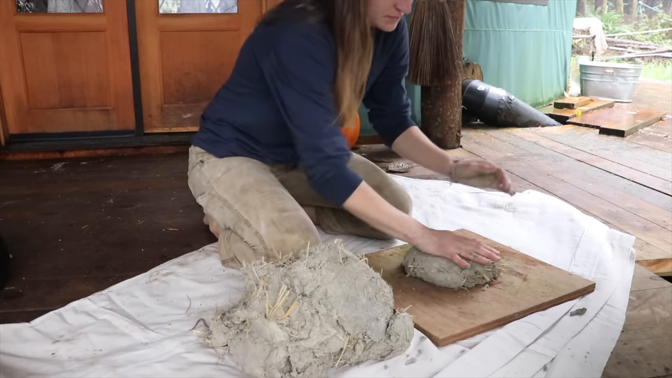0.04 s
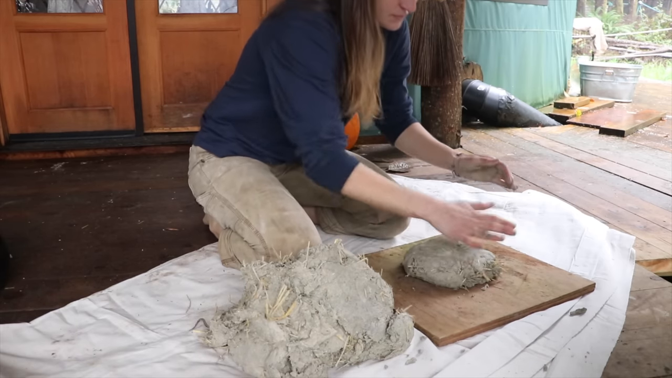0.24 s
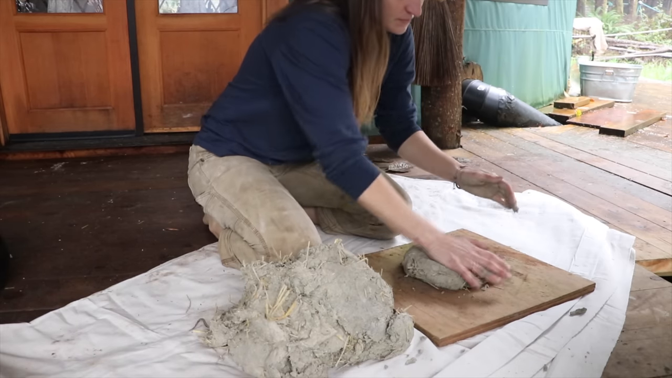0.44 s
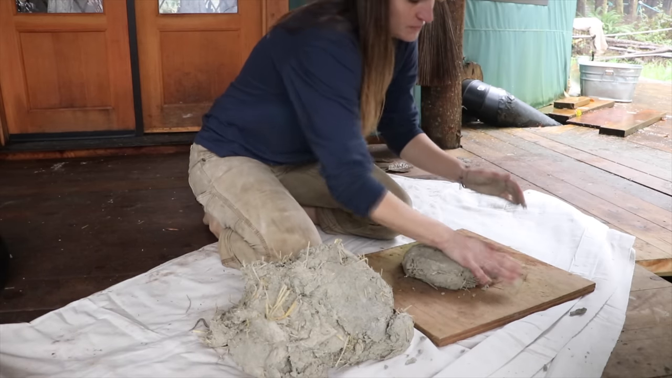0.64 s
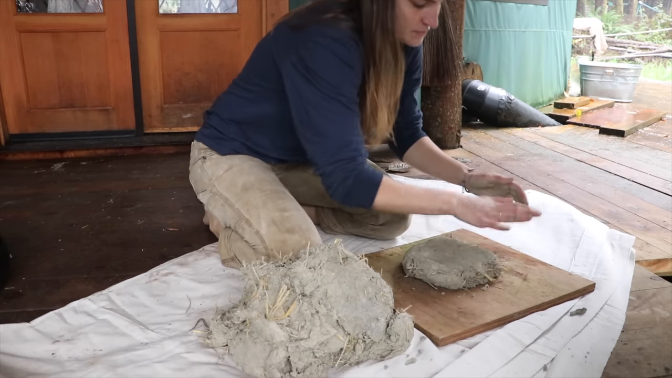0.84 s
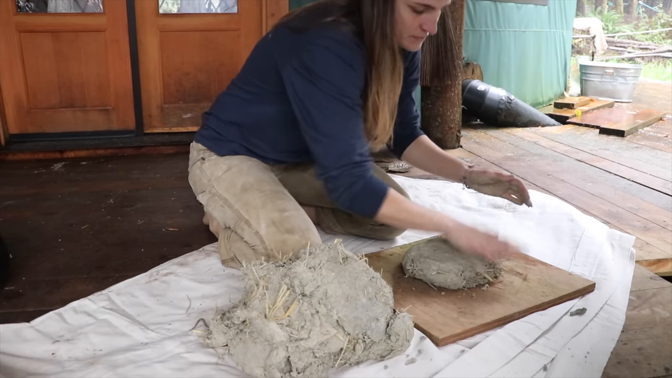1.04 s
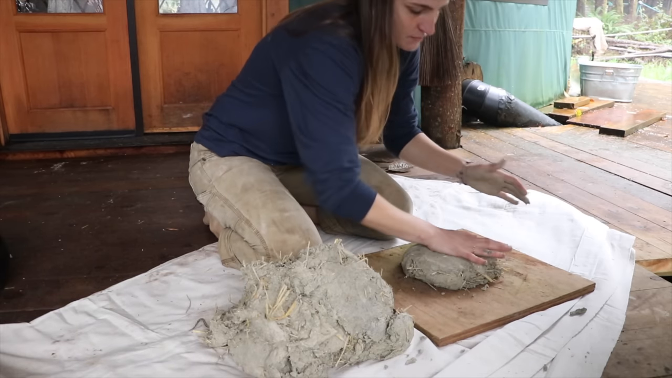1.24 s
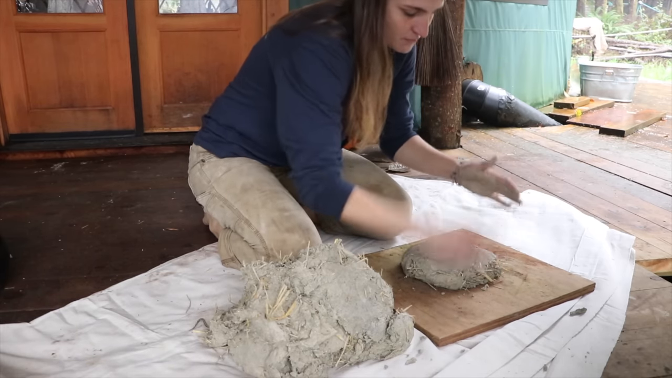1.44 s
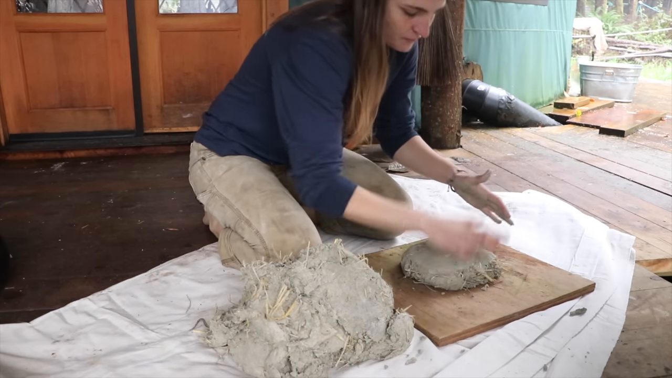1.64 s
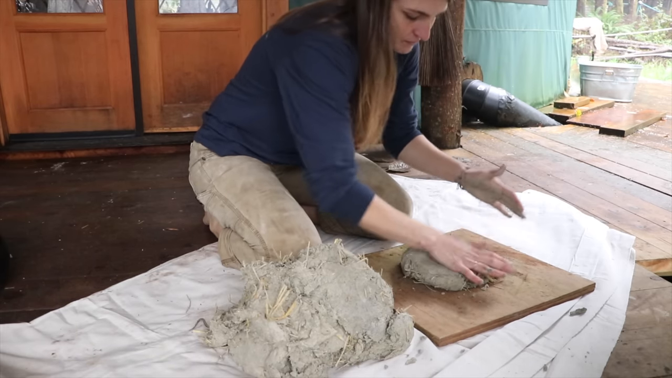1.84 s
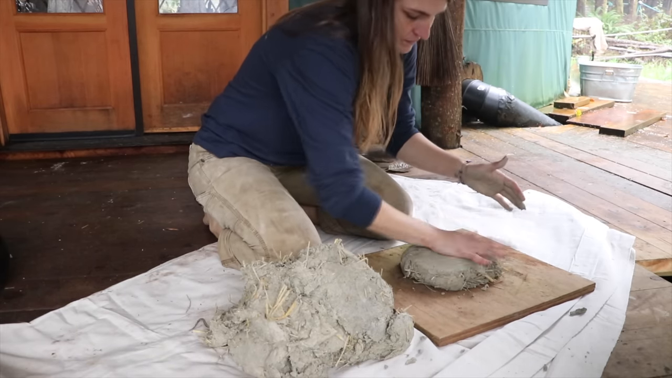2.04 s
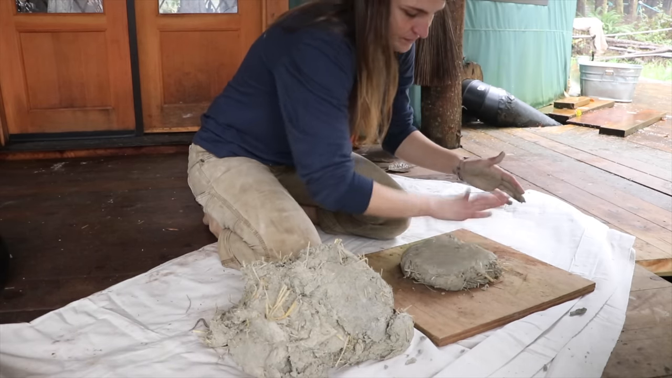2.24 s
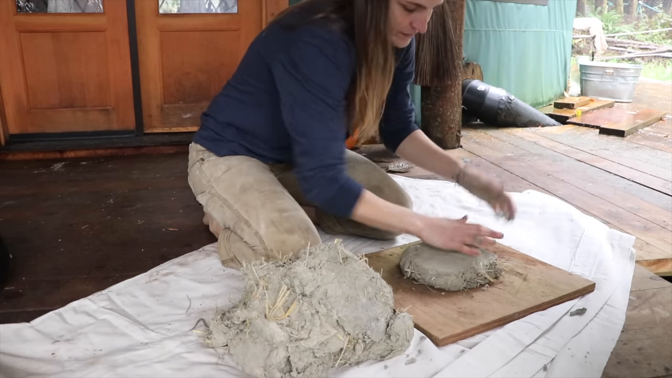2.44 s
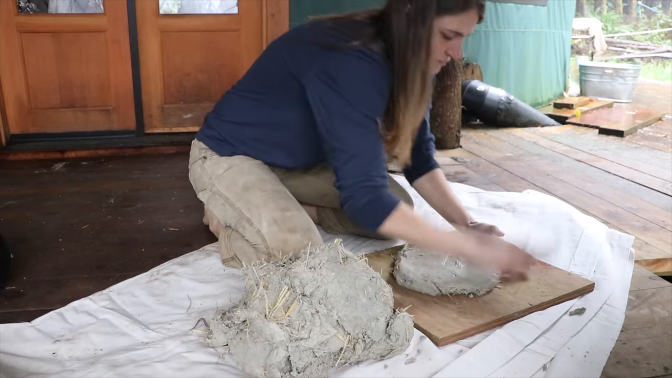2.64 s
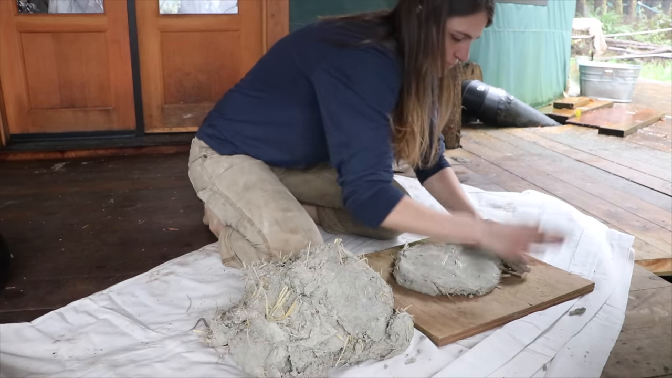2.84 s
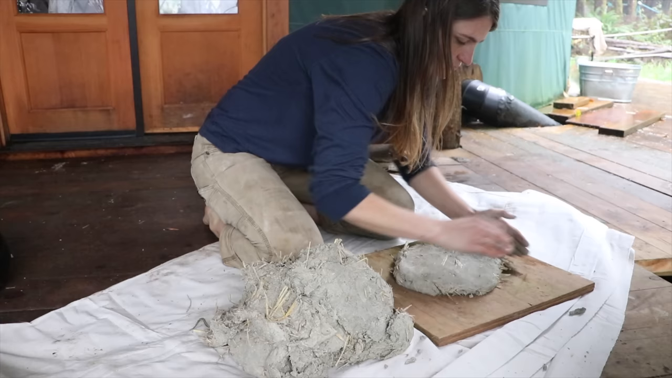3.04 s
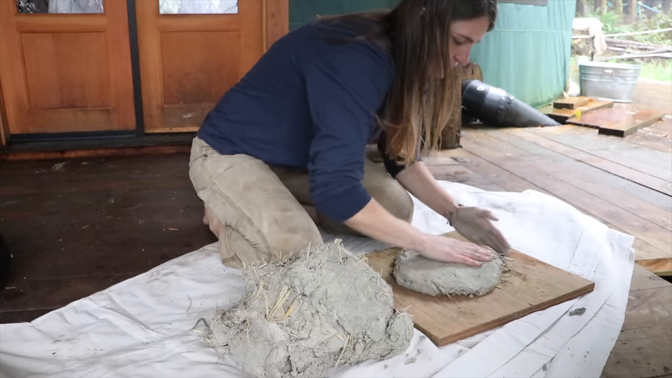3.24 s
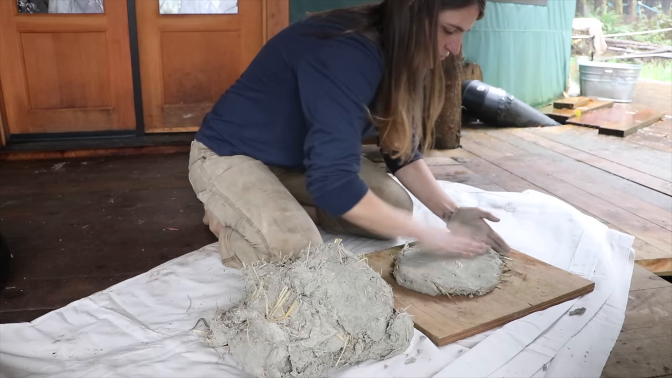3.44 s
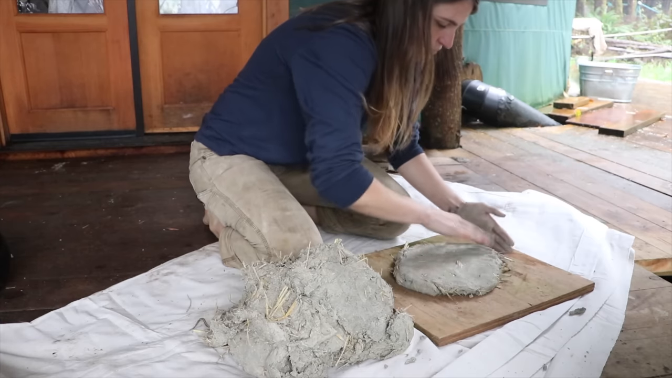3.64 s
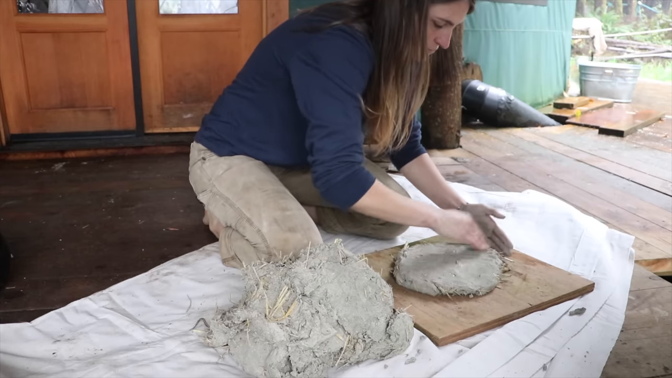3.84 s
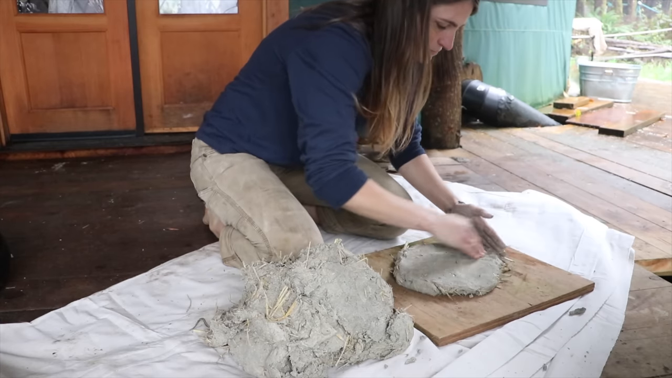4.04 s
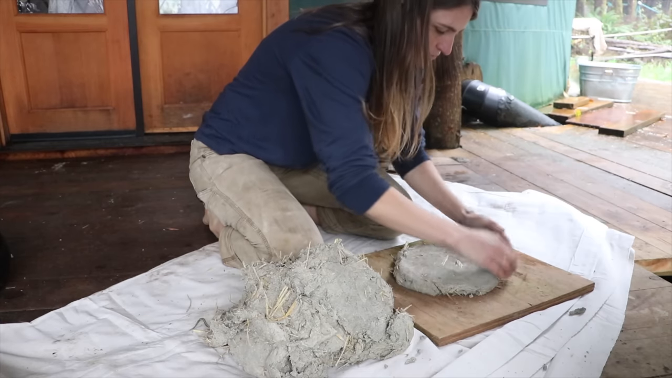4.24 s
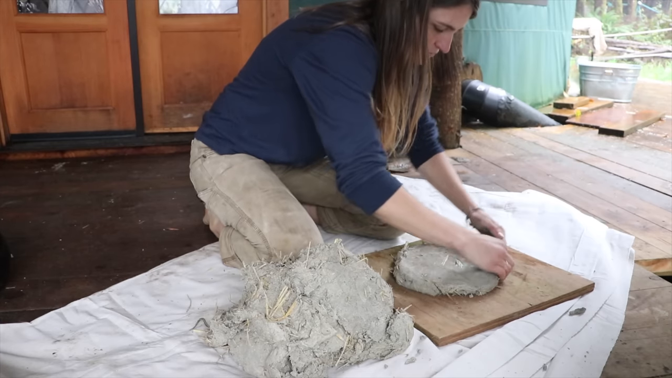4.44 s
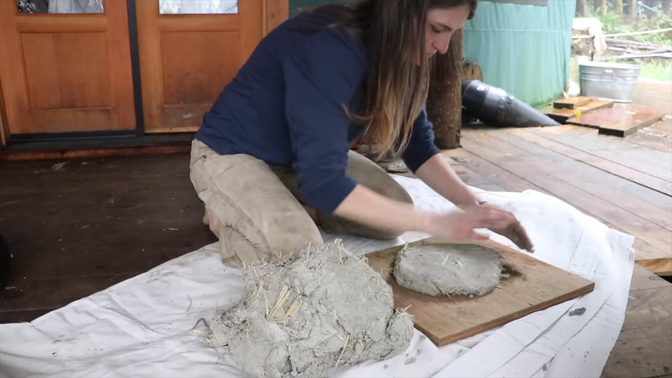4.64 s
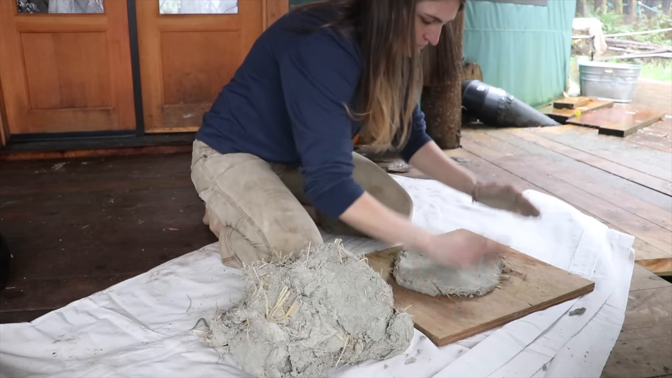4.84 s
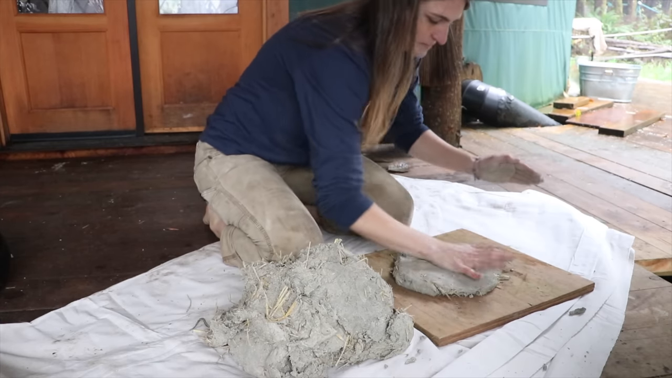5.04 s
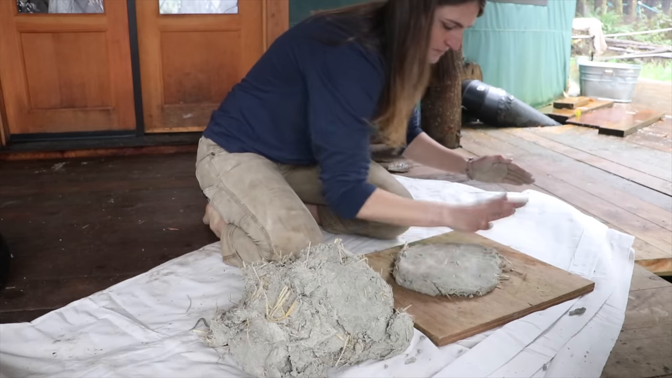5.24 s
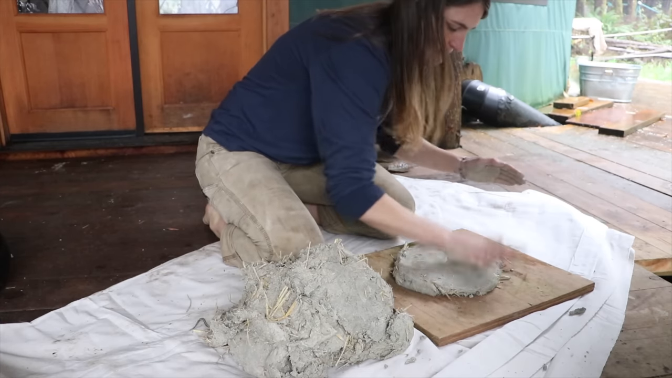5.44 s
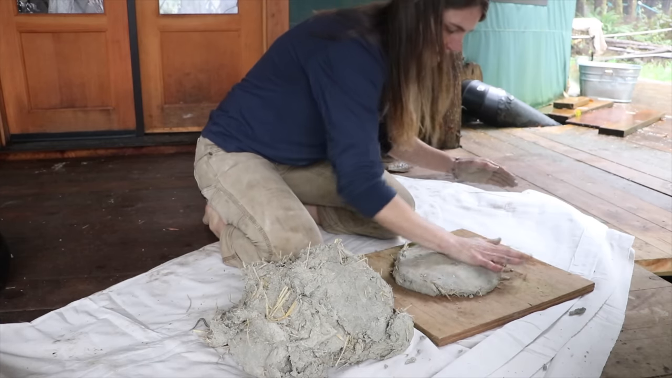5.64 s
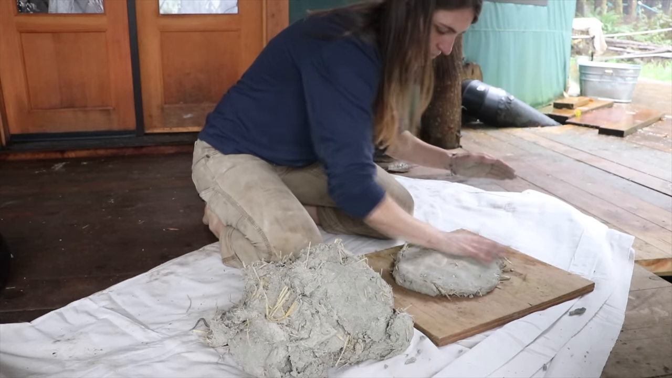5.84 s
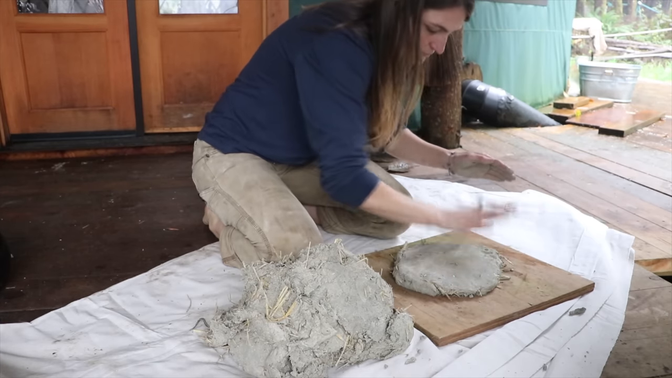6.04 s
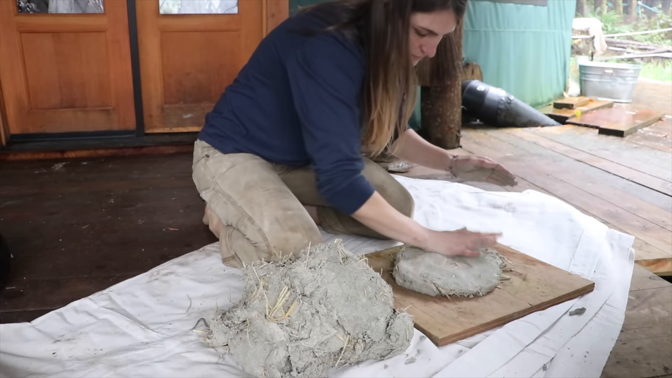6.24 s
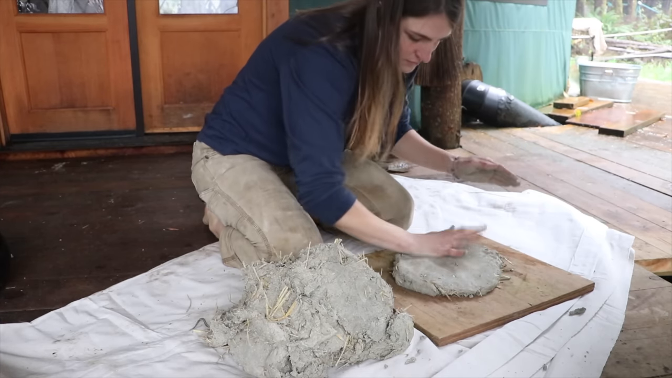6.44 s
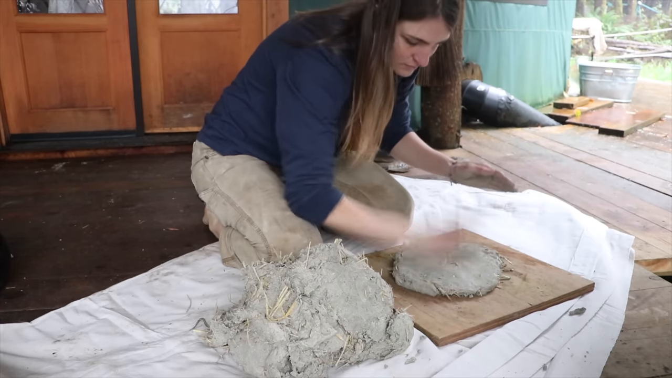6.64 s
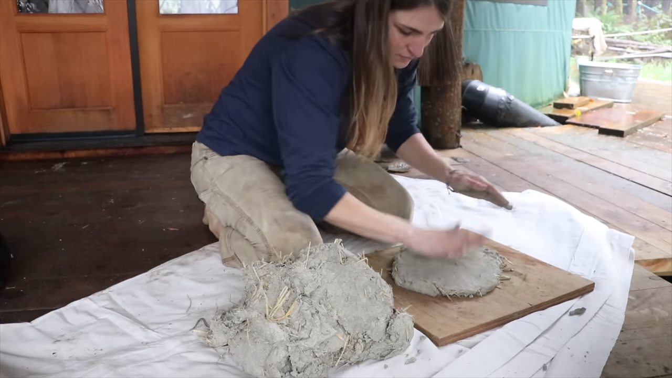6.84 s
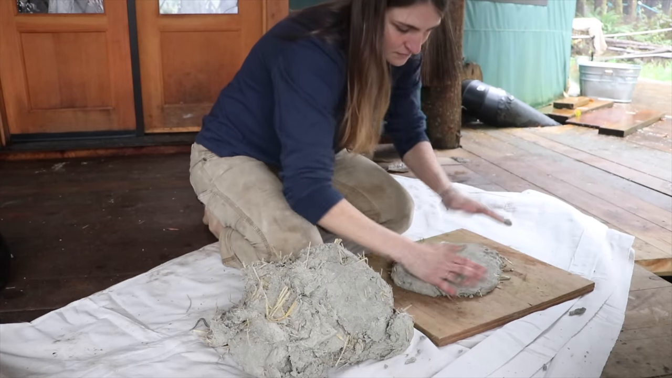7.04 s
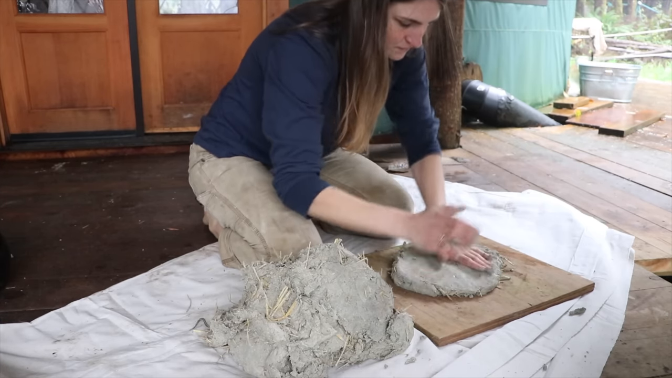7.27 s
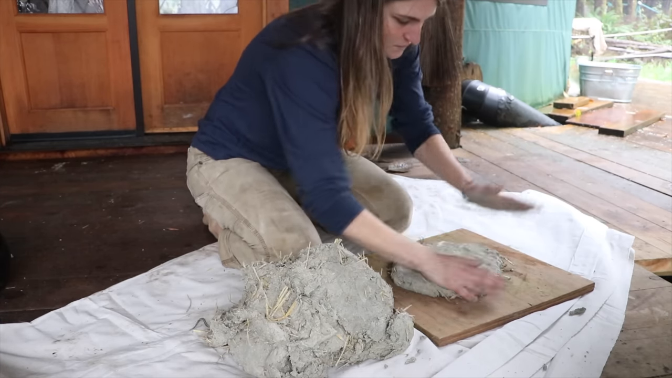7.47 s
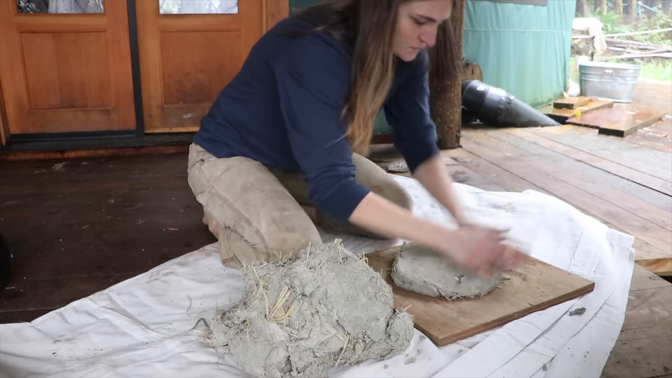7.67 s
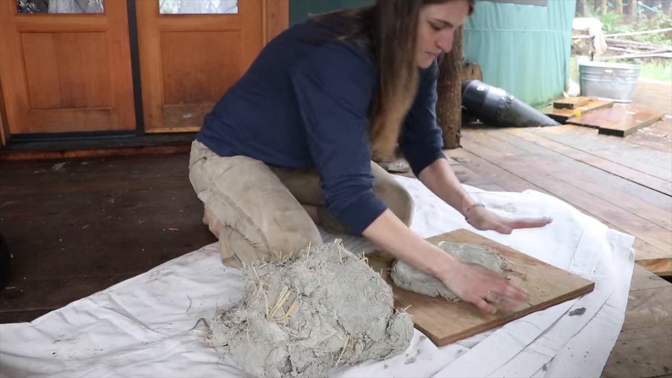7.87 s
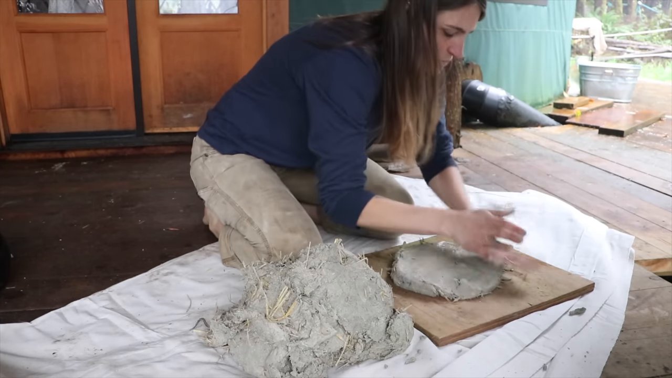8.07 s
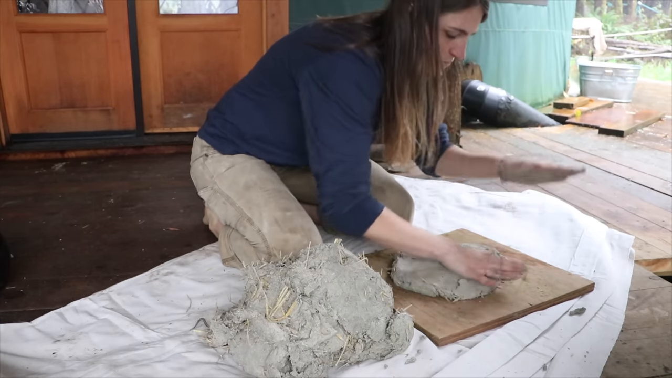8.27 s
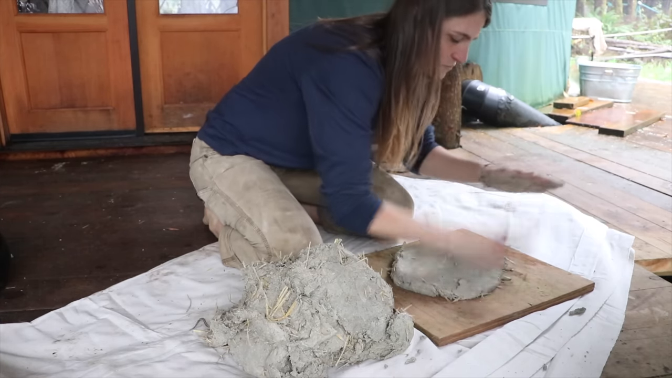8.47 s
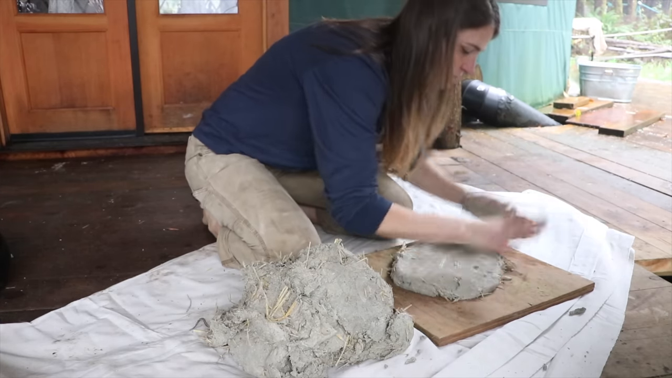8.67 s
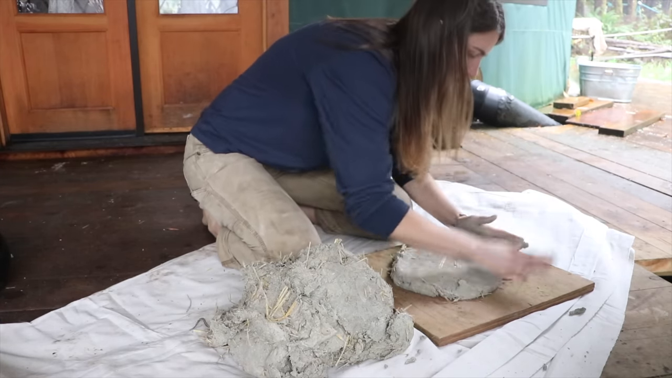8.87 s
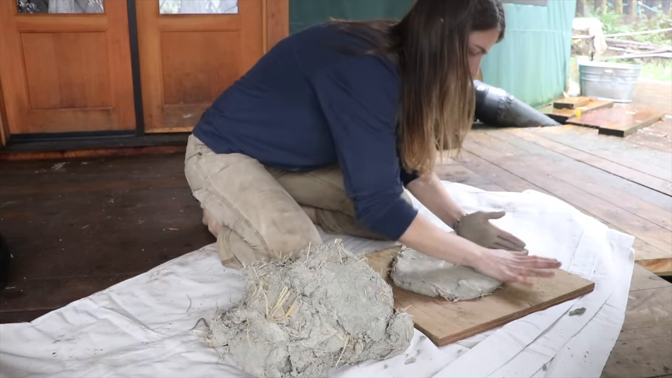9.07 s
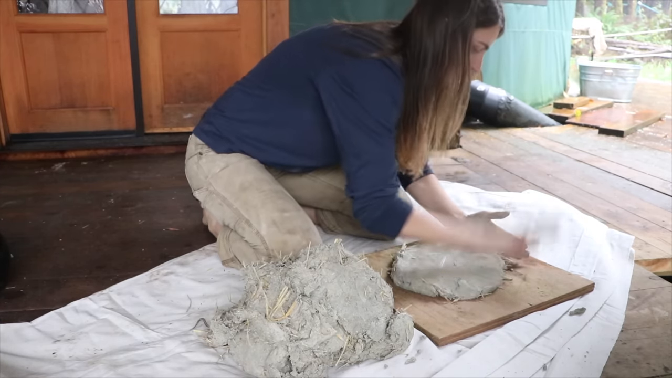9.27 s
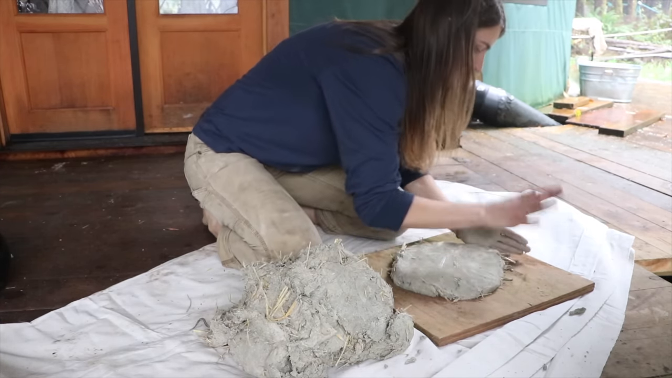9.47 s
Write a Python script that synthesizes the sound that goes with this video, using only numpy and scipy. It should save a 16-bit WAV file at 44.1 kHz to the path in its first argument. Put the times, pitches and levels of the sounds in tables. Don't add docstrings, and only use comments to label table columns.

```python
import sys
import numpy as np
from scipy import signal
from scipy.fft import rfft, irfft
from scipy.io import wavfile

SR = 44100
rng = np.random.default_rng(int(sys.argv[2]) if len(sys.argv) > 2 else 0)


def invert_db(level):
    return 10 ** (np.asarray(level, dtype=float) / 20)


def materialize(psi):
    bounded = np.clip(np.atleast_2d(psi).T, -1, 1)
    quanta = np.round(bounded * 32767).astype(np.int16)
    wavfile.write(sys.argv[1], SR, quanta)


N = 419391

# frequency in Hz, density in dB per Hz.
RAIN_COLOUR = [(18, -43), (40, -5), (118, -2.5), (204, -1.5), (336, 1), (801, -2), (1320, -1), (1810, -1.5),
               (2480, -8), (3770, 2), (5040, -15), (7670, -19), (9970, -27.5), (14800, -31), (16000, -32)]
# time in seconds, level in dB.
SHOWER_LEVEL = [(0.0, -43), (4.63, -43), (4.71, -42), (7.57, -42), (7.92, -43), (8.03, -42.5), (9.51, -41)]
# frequency in Hz, t60 in seconds.
PORCH_DECAY = [(120, 0.29), (300, 0.21), (900, 0.23), (2400, .2), (6400, 0.14), (14000, 0.29)]
# frequency in Hz, level in dB.
PORCH_LEVEL = [(120, -10), (300, -16.5), (900, -23), (2400, -11), (6400, -5), (14000, -19.5)]
# start in seconds, level in dB, pitch in Hz.
EAVES_DRIPS = [
    (1.668, -23, 4090),
    (3.847, -26.5, 4160),
]
# frequency in Hz, level in dB, t60 in seconds.
BANGLE_MODES = [(3620, -48, 0.14), (4290, -55, .15), (5800, -52, 0.3), (8400, -47, 0.16), (10998, -60, .1),
                (14400, -58, .15)]
# start in seconds, level in dB, extra level in dB of the modes above 7 kHz.
BANGLE_TOUCHES = [
    (4.775, 10, -30),
    (4.83, 3, -20),
    (4.885, -18, 7),
    (4.915, 3, -5),
    (4.94, -7, 2),
]
# start in seconds, level in dB, centre in Hz, length in seconds, grit in dB.
SMEARS = [(1.727, -37, 1300, 0.062, 7.5), (2.607, -34.5, 700, 0.07, -1), (3.846, -30, 1300, 0.022, -16),
          (6.086, -34.5, 1470, 0.06, 4.5), (9.264, -36, 1400, 0.059, 4), (2.884, -29.5, 1390, 0.032, -15),
          (2.92, -24.5, 1600, 0.041, -3.5), (2.988, -36, 1320, 0.046, 5), (3.16, -37.5, 1320, 0.067, 4),
          (3.32, -32, 1290, 0.043, 1), (3.517, -35, 1570, 0.023, 3), (3.607, -30.5, 1630, 0.11, -3.5),
          (4.133, -36.5, 1290, 0.028, 9.5), (4.189, -36, 1390, 0.028, 6), (4.242, -29, 1530, 0.054, 0.5),
          (4.289, -34, 1830, 0.031, -11), (4.348, -34, 1470, 0.033, 2.5), (4.522, -32.5, 1590, 0.054, 2),
          (4.63, -27.5, 765, 0.038, -8), (4.675, -35, 810, 0.014, -15), (4.974, -33, 730, 0.1, 0.5),
          (6.005, -32, 810, 0.037, 7), (6.645, -45, 1290, 0.04, -5), (7.119, -32, 1840, 0.046, 5)]
# tear in seconds, level in dB, stretch before it in seconds.
TEARS = [(0.186, -61, 0.091), (0.519, -37, .004), (0.778, -41, 0.01), (1.052, -36.5, 0.011),
         (1.343, -44.5, .032), (1.617, -29, .004), (1.892, -34, 0.0087), (2.177, -39.5, 0.017),
         (2.449, -45, 0.015), (2.775, -41, .016), (4.837, -36, 0.019), (4.946, -64, .06),
         (5.154, -38, 0.028), (5.452, -41, 0.018), (5.744, -37, 0.032), (6.013, -41, .03),
         (6.276, -39, 0.039), (6.519, -44, .02), (6.83, -41.5, 0.047), (7.037, -40, 0.021),
         (7.345, -45.5, 0.12), (7.634, -41.5, 0.035), (7.808, -50, .037), (7.943, -40, 0.025),
         (8.084, -40, 0.039), (8.327, -37.5, .017), (8.629, -34, .007), (8.883, -42, 0.023),
         (9.135, -42.5, 0.028), (9.404, -42, 0.012)]
# tear in seconds, level in dB, stretch in seconds.
TACKS = [(2.657, -53, .037), (2.891, -47, .008), (2.936, -47, .018), (3.197, -61, 0.012),
         (3.238, -57, .026), (3.28, -44, .01), (3.362, -44, 0.02), (3.378, -38, 0.0056), (3.478, -48, .006),
         (3.522, -49, 0.027), (3.644, -42.5, 0.045), (3.727, -38, 0.0036), (3.799, -45, 0.018),
         (3.848, -49, 0.065), (3.981, -53, .01), (4.066, -46.5, .034), (7.096, -51, 0.043),
         (9.273, -50, .01), (9.464, -52, 0.027)]
# frequency in Hz, level in dB, t60 in seconds.
DECK_MODES = [(85.8, -12.5, 0.25), (121, -11.5, 0.32), (142.8, -12.5, 0.092), (234.6, -10.5, 0.11),
              (266, -48.5, 0.2)]
# start in seconds, level in dB, pitch in Hz.
POPS = [(0.014, -27, 1030), (0.925, -14, 780), (1.191, -10, 400), (1.77, -11, 481), (2.05, -4.5, 510),
        (2.315, -9, 500), (2.694, -26.5, 420), (5.596, -19.5, 1040), (5.866, -19, 755), (6.157, -9, 575),
        (6.957, -7.5, 430), (7.184, -4, 637), (7.482, -13, 390), (7.723, -13.5, 686), (7.827, -7, 730),
        (7.968, -15, 525), (8.244, -16.5, 420), (8.53, -3, 586), (8.797, -8, 840), (9.058, -28, 423)]
# frequency in Hz, density in dB per Hz.
CRACK_COLOUR = [(530, 7.5), (900, 0.5), (1150, -3), (1470, -2), (1770, -2.5), (2730, -2.5), (3040, 0),
                (3860, 2), (4330, -5.5), (6500, -21), (8450, -41), (14300, -120)]
# start in seconds, extra ring of the gap in dB, extra spray in dB.
SPOTS = [(0.014, 11, -3), (1.488, 2, 1), (2.694, 17.5, 5), (4.721, 0.1, 3.5), (5.036, 13, 1.5),
         (5.33, 2.5, 2), (0.925, -3, 0.5), (1.77, 2, -0.5), (6.69, 13, 3), (7.723, 10.5, 1.5),
         (7.827, 0.5, 3), (7.968, 6.5, -0.5), (8.244, -11, 0.5), (8.53, 9, 2.5), (8.797, -15, 5),
         (9.324, 19.5, 5)]
# start in seconds, crack level in dB, crack pitch in Hz, thump level in dB, thump pitch in Hz.
FIRST_SLAPS = [(0.0143, -10.5, 2430, -19, 109), (0.3217, -7.5, 1670, -17, 125),
               (0.6479, -8, 3870, -17.5, 145), (0.9252, 4, 3480, -7, 143), (1.1909, 5, 2100, -7.5, 173),
               (1.4883, 1, 2050, -11, 134), (1.7702, 9, 2250, -6.5, 134), (2.0497, 8.5, 4170, -7.5, 142),
               (2.3152, 1.5, 3140, -8.5, 186), (2.6936, -10, 4350, -8, 106)]
PATS = [
    (3.1953, -30, 3880, -30.5, 173),
    (3.4741, -30, 3600, -31.5, 110),
    (3.7212, -39, 3380, -23, 140),
    (3.975, -48, 1810, -28, 116),
    (4.3035, -53, 1610, -39, 150),
]
SECOND_SLAPS = [(4.7209, -11, 2500, -8, 112), (5.036, -5, 3570, -2.5, 127), (5.3291, -7, 2480, -3.5, 117),
                (5.5955, -1.5, 3970, -5.5, 124), (5.8648, -2, 4240, -8.5, 118), (6.1564, -1, 4070, -7, 177),
                (6.4294, -18, 3800, -17.5, 90.5), (6.6893, -8.5, 4300, -7.5, 116),
                (6.9564, 1, 3640, -8.5, 184), (7.184, 1.9, 1430, -8, 155.5), (7.482, 11, 2980, -4.5, 117),
                (7.7214, 1.5, 3300, -7.5, 136), (7.827, 2, 4160, -6, 103), (7.9682, -2, 1420, -4.5, 139),
                (8.2442, 4.5, 3700, -7, 131), (8.53, 2.5, 925, -5.5, 158), (8.7969, -3, 1500, -4, 121),
                (9.0574, -2, 4050, -4, 114), (9.324, -4.5, 4030, -5.5, 105)]
BLOWS = FIRST_SLAPS + PATS + SECOND_SLAPS

GROUND_DB, GROUND_T60_S = -23.5, 0.96
DRIP_S, DRIP_SAG = 0.0067, 0.086
TEAR_HZ, TACK_HZ = 10000, 10000
LET_GO_S, LET_GO_SHARE = 0.0021, 0.38
FINGER_LEAD_S, FINGER_DB, FINGER_RISE_S, FINGER_FALL_S = 0.042, -52.5, 0.012, 0.042
DECK_DB, DECK_FOLLOWS, DECK_LEAD_S = 0.76, 0.02, 0.0029
FLAT_POP_DB, FLAT_POP_FOLLOWS, FLAT_POP_HZ = -24.5, 0.65, 417
WALL_ECHO_S, WALL_ECHO_DB = 0.028, -12
SPRAY_DB, SPRAY_FOLLOWS, SPRAY_DB_PER_OCTAVE = -18.5, 0.73, 1.5
MIST_FOLLOWS = 0.97
GAP_RING_DB, ECHO_DB, ECHO_FOLLOWS = -3.5, -3.5, -0.26
MIC_TOP_HZ = 16150


def at_hz(points, hz):
    return np.interp(np.log(hz), np.log(np.array(points)[:, 0]), np.array(points)[:, 1])


def shaped(x, points):
    hz = np.maximum(np.fft.rfftfreq(len(x), 1 / SR), 1)
    y = irfft(rfft(x) * invert_db(at_hz(points, hz)), len(x))
    return y / np.sqrt(np.mean(y ** 2) + 1e-20)


def band(x, low_hz, high_hz):
    edges = [low_hz, min(high_hz, 0.45 * SR)]
    return signal.sosfilt(signal.butter(2, edges, "band", fs=SR, output="sos"), x)


def ring(x, hz, t60):
    r, w = invert_db(-60 / (t60 * SR)), 2 * np.pi * hz / SR
    return signal.lfilter([0, np.sin(w)], [1, -2 * r * np.cos(w), r * r], x + 1e-18)


def add(out, s, piece):
    i = max(round(s * SR), 0)
    out[i:i + len(piece)] += piece[:N - i]


def row_at(table, s, otherwise):
    return next((row[1:] for row in table if abs(row[0] - s) < 0.02), otherwise)


def drift(rate):
    knots = rng.standard_normal(400)
    return np.interp(np.arange(N) / SR * rate, np.arange(400), knots)


def lumps(count, size, lumpy_db):
    knots = rng.standard_normal((count, size // 128 + 2))
    return [invert_db(lumpy_db * np.interp(np.arange(size) / 128, np.arange(len(row)), row)) for row in knots]


def snaps(count, per_s):
    born = rng.random((count, 6000)) < per_s / SR
    return rng.standard_normal((count, 6000)) * (0.38 + 0.86 * born * np.sqrt(SR / per_s))


def porch(t, hz):
    swell = np.clip((t - 0.004) / 0.0068, 0, 1)
    return swell * invert_db(at_hz(PORCH_LEVEL, hz) - 60 * t / at_hz(PORCH_DECAY, hz))


def rain():
    s, level_db = np.transpose(SHOWER_LEVEL)
    drop_level = invert_db(4.04 * np.minimum(rng.exponential(1, N), 4))
    drops = (rng.random(N) < 900 / SR) * drop_level * rng.choice([-1, 1], N)
    hiss = shaped(rng.standard_normal(N) + 1.23 * drops, RAIN_COLOUR)
    roof = signal.sosfilt(signal.butter(2, 2500, fs=SR, output="sos"), hiss)
    sheet = hiss - roof
    patchy = roof * invert_db(1.5 * drift(25.0)) + sheet * invert_db(1.5 * drift(23.0))
    gusts_db = 0.8 * drift(9.0)
    return band(patchy, 41, 20000) * invert_db(np.interp(np.arange(N) / SR, s, level_db) + gusts_db)


def joists():
    swing = np.zeros(N)
    decay_db = -60 * np.arange(30000) / SR / GROUND_T60_S
    for s, _, _, thump_db, _ in BLOWS:
        add(swing, s, invert_db(thump_db + GROUND_DB + decay_db))
    return swing * shaped(rng.standard_normal(N), [(15, -10), (30, 26.5), (55, 13), (90, 3), (200, -41.5)])


def drips():
    out, t = np.zeros(N), np.arange(0, DRIP_S, 1 / SR)
    for s, level_db, hz in EAVES_DRIPS:
        chirp = np.sin(2 * np.pi * hz * t * (1 - DRIP_SAG * t / DRIP_S / 2))
        add(out, s, invert_db(level_db) * np.sin(np.pi * t / DRIP_S) ** 0.5 * chirp)
        tail = band(rng.standard_normal(4000), hz / 1.2, hz * 1.15) * porch(np.arange(4000) / SR, 2400)
        add(out, s, invert_db(level_db + 7) * tail)
    return out


def bangle():
    out, touches = np.zeros(N), rng.normal(0, 2.5, (len(BANGLE_TOUCHES), len(BANGLE_MODES)))
    for (s, touch_db, bright_db), spread in zip(BANGLE_TOUCHES, touches):
        for (hz, level_db, t60), own_db in zip(BANGLE_MODES, spread):
            mode_db = touch_db + level_db + own_db + bright_db * (hz > 7000)
            add(out, s, ring(np.pad([invert_db(mode_db)], (0, 12000)), hz, t60))
    return out


def smears():
    out, t = np.zeros(N), np.arange(6000) / SR
    for (s, level_db, hz, length, grit_db), grains in zip(SMEARS, snaps(len(SMEARS), 1500)):
        rub = 0.32 * band(grains, hz / 1.35, hz * 1.35) + 0.5 * band(grains, 270, 1900)
        grit = 0.82 * band(grains, 3470, 4240) + 0.082 * band(grains, 5100, 7200)
        stroke = np.clip(t / (0.16 * length), 0, 1) * np.exp(-(t / length) ** 2)
        add(out, s, invert_db(level_db + 7) * (rub + invert_db(grit_db) * grit) * stroke)
    return out


def peels():
    out, t = np.zeros(N), np.arange(-3500, 2500) / SR
    rows = [(s, level_db, hz, rise, LET_GO_S + LET_GO_SHARE * rise)
            for table, hz in ((TEARS, TEAR_HZ), (TACKS, TACK_HZ)) for s, level_db, rise in table]
    rows += [(s - FINGER_LEAD_S, FINGER_DB, TACK_HZ, FINGER_RISE_S, FINGER_FALL_S) for s, _, _ in TEARS]
    for (s, level_db, hz, rise, fall), grains in zip(rows, snaps(len(rows), 2500)):
        stretch_db = 12.0 * t / max(rise, 0.002)
        release_db = -9.0 * (t / max(fall, 0.002)) ** 2
        shape_db = np.maximum(np.where(t < 0, stretch_db, release_db), -90)
        add(out, s + t[0], invert_db(level_db + shape_db) * band(grains, hz / 1.87, hz * 1.64))
    return out


def thumps():
    out, t = np.zeros(N), np.arange(14000) / SR
    noise = rng.standard_normal((len(BLOWS), 14000))
    touch = rng.normal(0, 3.5, (len(BLOWS), len(DECK_MODES)))
    push = np.pad(np.hanning(130) / 65, (260, 14000 - 390))
    swell = (t / 0.011) * np.exp(1 - (t / 0.0075) ** 1.92)
    sag = t + 0.0018 * (1 - np.exp(-t / 0.00057))
    for (s, _, _, thump_db, thump_hz), air, spread in zip(BLOWS, noise, touch):
        add(out, s + 0.0036, invert_db(thump_db + 4.5) * np.sin(2 * np.pi * thump_hz * sag) * swell)
        rumble = shaped(air, [(48, -40), (78, -5), (thump_hz, 0), (230, -8), (500, -50)]) * porch(t, 99)
        deck = sum(invert_db(level_db + own_db) * ring(push, hz, t60)
                   for (hz, level_db, t60), own_db in zip(DECK_MODES, spread))
        deck_db = (1 + DECK_FOLLOWS) * thump_db + DECK_DB - 2.5
        add(out, s - DECK_LEAD_S, invert_db(deck_db) * (deck + rumble))
    return out


def pops():
    out, t = np.zeros(N), np.arange(14000) / SR
    noise = rng.standard_normal((len(BLOWS), 14000))
    kick = np.pad(np.hanning(20) / -7, (35, 14000 - 55))
    for (s, crack_db, _, _, _), air in zip(BLOWS, noise):
        flat_palm = (FLAT_POP_DB + FLAT_POP_FOLLOWS * crack_db, FLAT_POP_HZ)
        pop_db, hz = row_at(POPS, s, flat_palm)
        hollow = shaped(air, [(hz / 8, -40), (hz / 10.5, -13), (hz / 1.38, -9), (hz, 0),
                              (hz * 1.43, -8), (hz * 4, -24), (hz * 16, -70)])
        splat = 0.3 * hollow * np.clip(t / 0.002, 0, 1) * np.exp(-t / 0.005)
        add(out, s, invert_db(pop_db + 14) * (ring(kick, hz, 4.8 / hz) + splat + hollow * porch(t, hz)))
        add(out, s + WALL_ECHO_S, invert_db(pop_db + 8 + WALL_ECHO_DB) * ring(kick, hz, 9.8 / hz))
    return out


def cracks():
    out, t = np.zeros(N), np.arange(14000) / SR
    noise = rng.standard_normal((len(BLOWS), 2, 14000))
    clumps = lumps(count=len(BLOWS), size=14000, lumpy_db=3.0)
    burst = np.clip((t / 0.0014) ** 2, 0.12, 1) * np.exp(-np.maximum(t - 0.0025, 0) / 0.0013)
    for (s, crack_db, crack_hz, _, _), (wet, fine), clump in zip(BLOWS, noise, clumps):
        ring_db, wet_db = row_at(SPOTS, s, (0, 0))
        clump = clump * invert_db(ECHO_DB + ECHO_FOLLOWS * crack_db)
        wet = band(shaped(wet, CRACK_COLOUR) * (burst + clump * porch(t, 2500)), 1010, 11700)
        gap = 0.077 * invert_db(GAP_RING_DB + ring_db) * ring(wet, crack_hz, 14.6 / crack_hz)
        add(out, s, invert_db(crack_db - 2.0) * (wet + gap))
        spray = band(fine, 5270, 9330) * (burst + clump * porch(t, 7000))
        mist = band(fine, 5050, 13850) * (burst + clump * porch(t, 17000))
        pitch_db = SPRAY_DB_PER_OCTAVE * np.log2(crack_hz / 3000)
        spray_db = SPRAY_DB + wet_db + SPRAY_FOLLOWS * crack_db + pitch_db
        add(out, s, invert_db(spray_db + 0.5) * (spray + 0.94 * invert_db(MIST_FOLLOWS * wet_db) * mist))
    return out


def scene():
    around = rain() + joists() + drips() + bangle()
    hand = smears() + peels() + thumps() + pops() + cracks()
    return (around + hand)[None]


def roll_off(x):
    return signal.sosfilt(signal.butter(12, 16610, fs=SR, output="sos"), x)


def record(dry):
    x = signal.sosfilt(signal.butter(3, 72, "high", fs=SR, output="sos"), dry)
    x = signal.sosfilt(signal.cheby2(14, 45, MIC_TOP_HZ, fs=SR, output="sos"), x)
    mix = np.clip(x, -0.98, 0.98)
    return roll_off(mix)


dry = scene()
out = record(dry)
materialize(out)
```